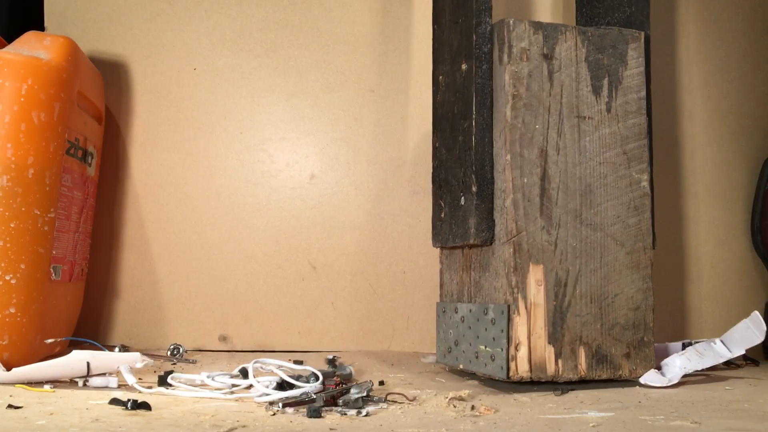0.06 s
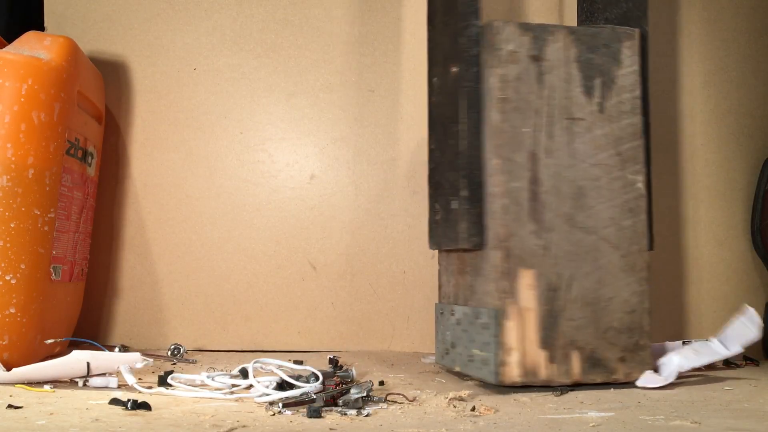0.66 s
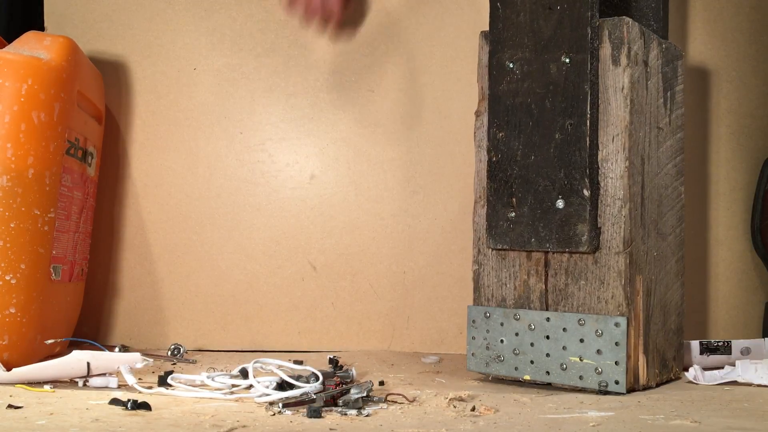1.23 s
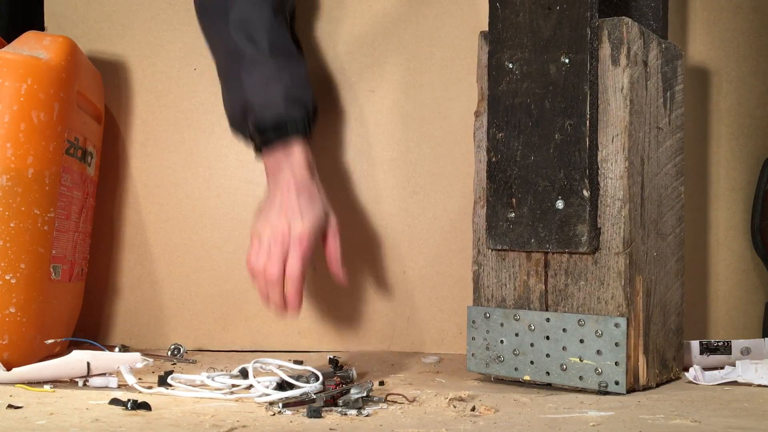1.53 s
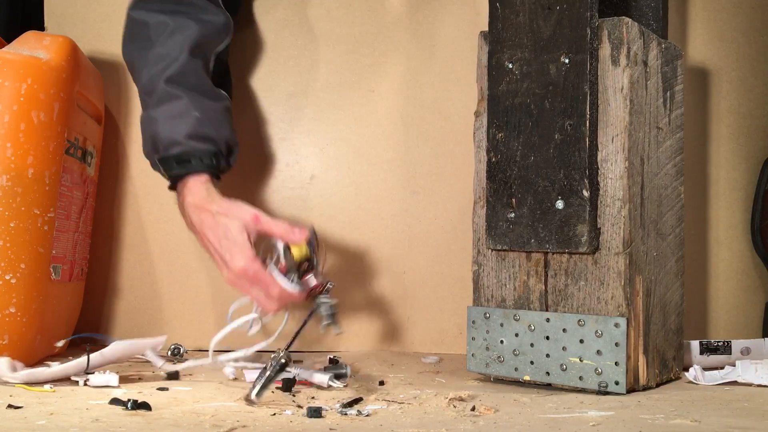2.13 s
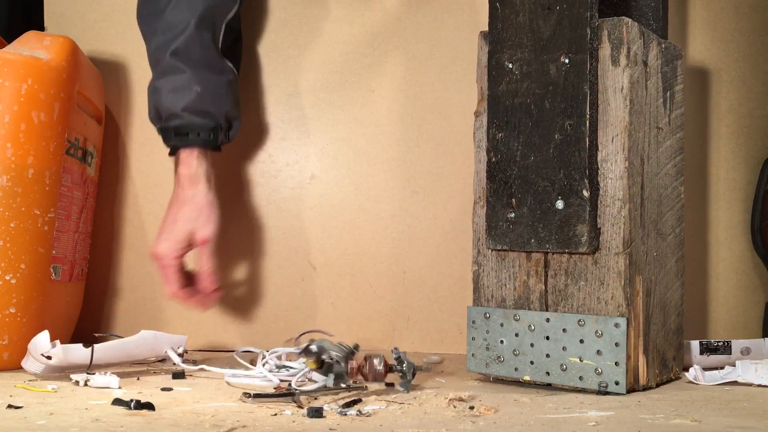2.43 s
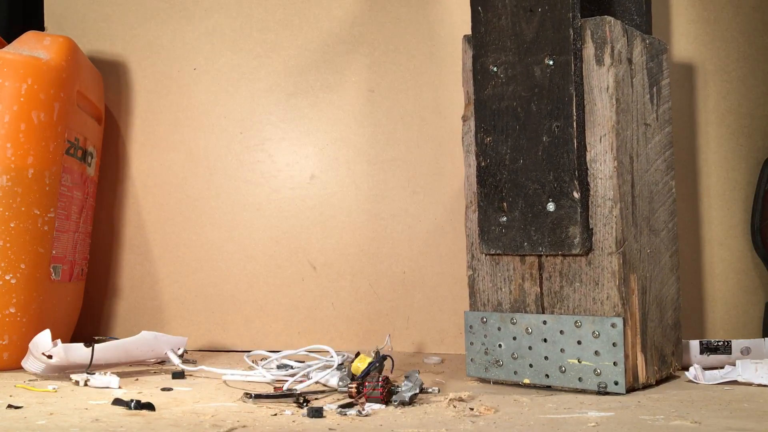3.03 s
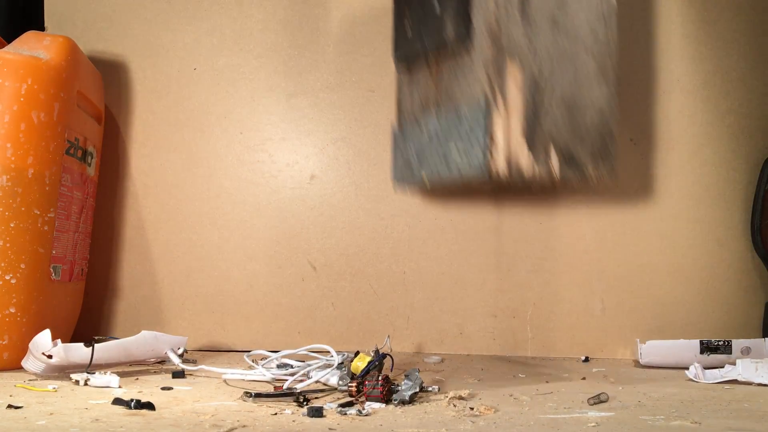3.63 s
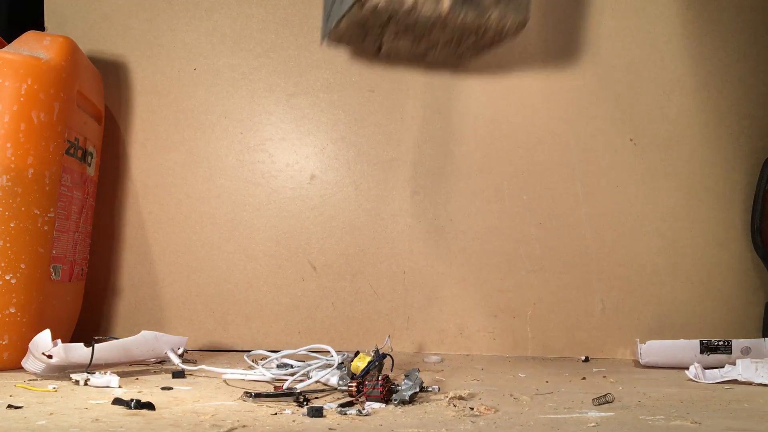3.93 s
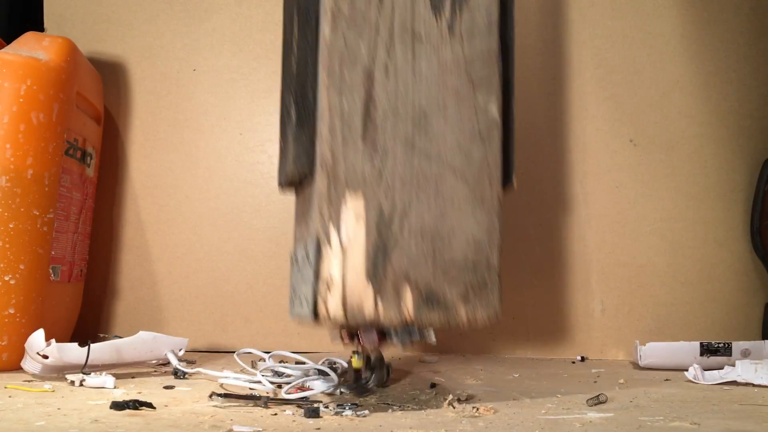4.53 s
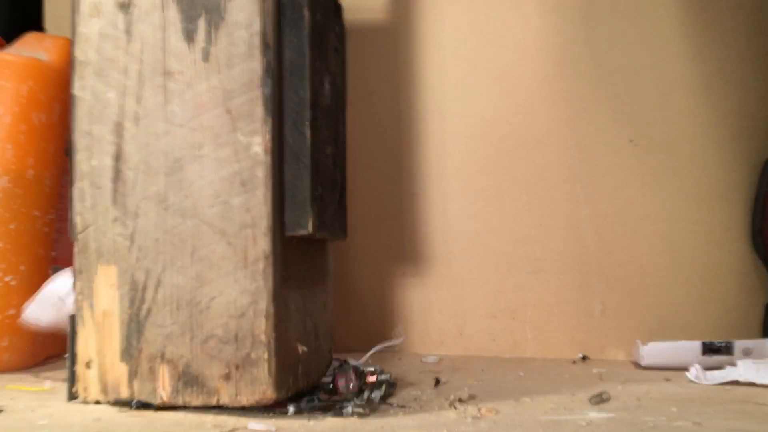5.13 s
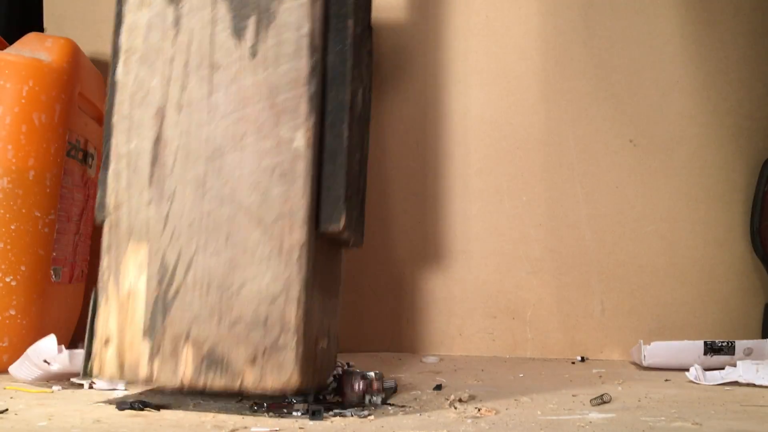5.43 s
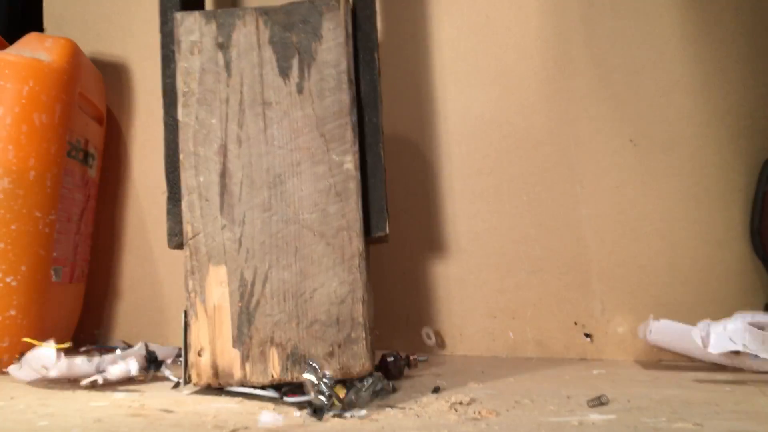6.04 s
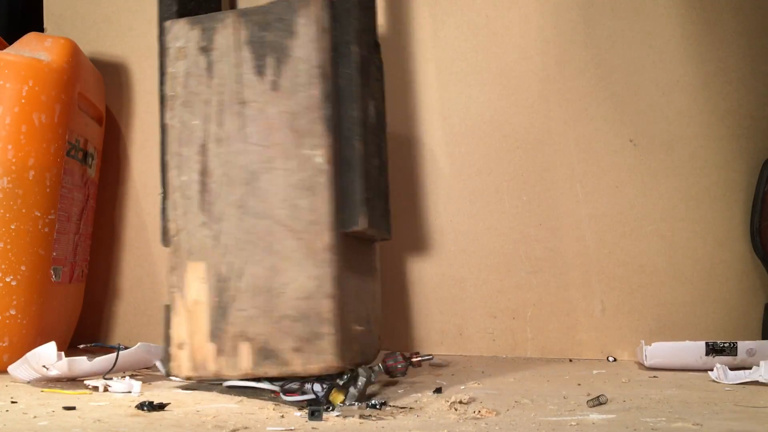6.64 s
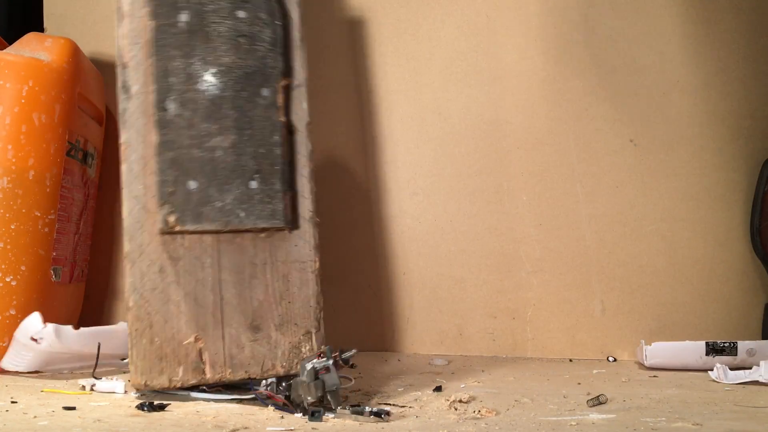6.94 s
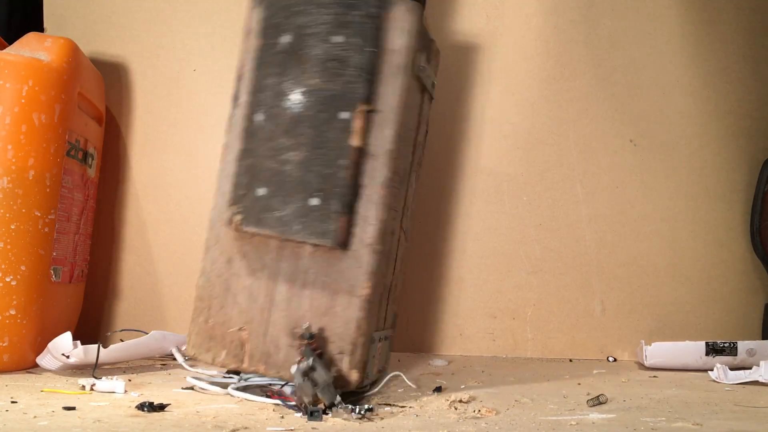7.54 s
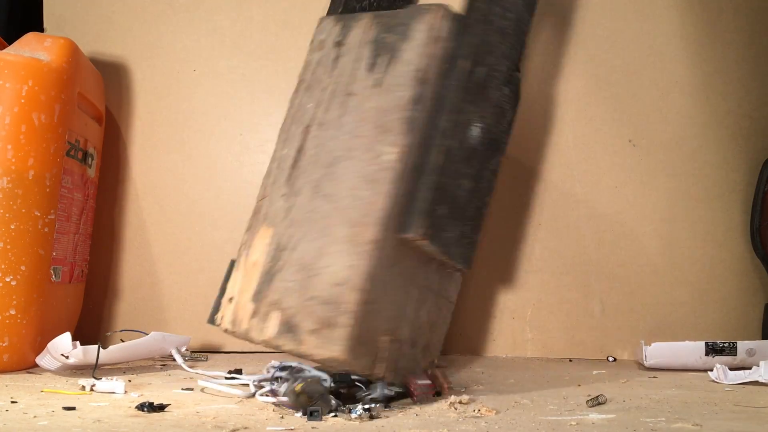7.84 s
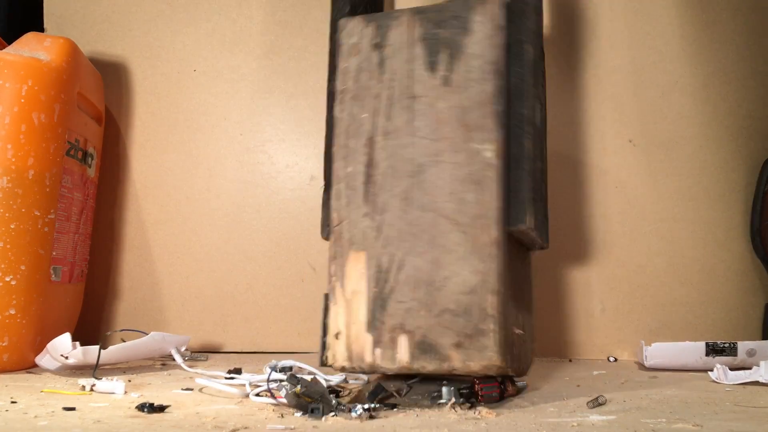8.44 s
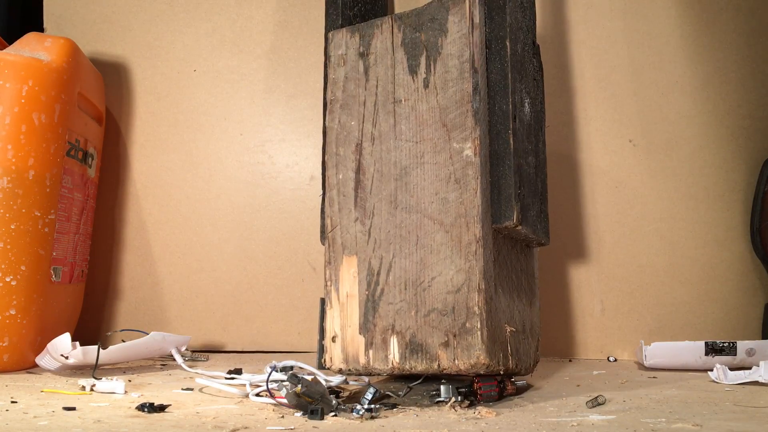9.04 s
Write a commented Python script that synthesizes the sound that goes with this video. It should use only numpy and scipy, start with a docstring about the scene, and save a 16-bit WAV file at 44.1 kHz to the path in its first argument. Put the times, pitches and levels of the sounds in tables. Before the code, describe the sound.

For the first 1.5 seconds a heavy wooden beam shuffles over a workbench with scrapes, knocks and soft bumps. Broken appliance pieces are then shifted, rattling, and drop with a sharp plastic clatter and metal clink at 2.5 seconds. A short scrape and knock follow near 3.5. At about 4.2, 5.2 and 6.1 seconds the beam slams down, the loudest sounds, each a burst of crunching plastic with a deep boom from the bench. Between the blows, bits clatter and a small motor clinks brightly, most clearly near 4.9. From 6.3 to 8.4 seconds the beam grinds over the wreckage with gritty scraping, snaps and brief wooden groans. It thumps down around 8.6 and gives a short, high metallic squeak just after 9. The microphone is close, in a small workshop with a very short echo and a faint low rumble.

```python
"""Wooden beam smashing an appliance

One microphone, close to a bench in a small workshop. A heavy beam is shuffled over the bench, then
slammed three times onto a broken appliance: plastic crushes and the bench top booms. Between blows
a hand shifts the wreckage, plastic bits clatter, the little motor clinks, and the beam grinds over
the pieces before it is set down with a squeak. Behind it all are a short room tail and low rumble."""
import sys
import numpy as np
from scipy import signal
from scipy.fft import rfft, irfft
from scipy.io import wavfile
from scipy.ndimage import uniform_filter1d

SR = 44100
rng = np.random.default_rng(int(sys.argv[2]) if len(sys.argv) > 2 else 0)


def generate_wav(sig):
    """Save sig (samples, or channels by samples) to the path in sys.argv[1] as 16-bit PCM at SR."""
    pcm = np.round(np.clip(np.atleast_2d(sig).T, -1, 1) * 32767).astype(np.int16)
    wavfile.write(sys.argv[1], SR, pcm)


N = 409248
TIME = np.arange(N) / SR


# Spectrum of plastic being crushed: frequency_hz, relative_db
CRUSH_SPECTRUM = [(60, -27), (170, 16), (400, 9), (800, -5.5), (1300, -9), (2100, -11.5), (3000, -21.5),
                  (5000, -30), (6500, -28), (10000, -35), (16000, -40)]
# The beam comes down, close to the microphone:
# start_s, crush_db, boom_relative_db, splinter_relative_db, rise_s, bench_thud_db
BEAM_BLOWS = [(4.2313, -13, -1, -8, 0.0056, -8.5), (5.214, -9.5, -21, -6, 0.0032, -6),
              (6.091, -10.5, -2, -12.5, 0.0039, -10.5)]

def crush(hold_s=0.0052, clump_db=4.0, clump_hz=400, t60s_s=(0.15, 0.18, 0.13), boom_lag_s=0.00725):
    """Plastic gives way under each blow in a clumped burst of fractures; the splinters stop first."""
    out, t = np.zeros(N), TIME[:SR // 2]
    responses = wood_responses(CRUSH_SPECTRUM)
    lags = (boom_lag_s, 0, 0)  # the heavy wood follows later
    for start, db, boom_db, splinter_db, rise, _ in BEAM_BLOWS:
        onset = np.minimum(t / rise, 1) ** 2
        fractures = onset * rng.standard_normal(len(t)) * amp(clump_db * wander(len(t), clump_hz))
        for response, relative_db, t60, lag in zip(responses, (boom_db, 0, splinter_db), t60s_s, lags):
            force = fractures * decay(t - rise - hold_s, t60)
            add(out, start + lag, strike(force, response, db + relative_db))
    return out


# Bending modes of the bench top: pitch_hz, relative_db, t60_s, build_up_s
BENCH_MODES = [(55.9, -7.5, 0.52, 0.042), (68.64, -28, 0.99, 0.1), (95.6, -6, 0.22, 0.015),
               (120.3, -1.5, 0.26, 0.019), (139.3, -13.5, 0.33, 0.037), (164.5, -9.5, 0.18, 0.017),
               (204, -15, 0.28, 0.032), (251, -16, 0.32, 0.029), (348, -19, 0.35, 0.0034),
               (488, -19.5, 0.18, 0.0066)]

def thud(contact_s, uneven_db=1.0, detune=0.014, tension=0.06, tension_s=0.041):
    """The bench top swings up and rings, sinking in pitch as the load eases."""
    t, out = TIME[:SR], 0
    gliding_time = t + tension * tension_s * (1 - np.exp(-t / tension_s))
    for hz, db, t60, build in BENCH_MODES:
        place, load = rng.standard_normal(2)
        swell = np.sin(np.pi / 2 * np.minimum(t / (0.71 * build), 1)) ** 4
        gain = amp(db + uneven_db * place) / (1 + (hz * contact_s) ** 4)  # soft contact: low modes only
        tone = np.sin(2 * np.pi * hz * (1 + detune * load) * gliding_time)
        out = out + gain * swell * decay(t - build, t60) * tone
    return out


# The beam settles or rebounds on the bench: start_s, level_db, contact_s
BEAM_BUMPS = [(.0, -26, 0.015), (.121, -27, 0.012), (0.441, -31, 0.015), (0.918, -27.5, 0.0018),
              (1.108, -31, 0.0015), (2.494, -25, 0.0018), (4.532, -18, 0.014), (4.67, -32.5, 0.01),
              (5.372, -31.5, 0.0054), (5.588, -27, 0.0082), (5.72, -33.5, 0.0074), (6.379, -28.5, 0.0079),
              (6.699, -33, 0.0071), (7.64, -31, 0.013), (8.556, -19, 0.00357), (8.591, -23.5, 0.0036)]

def bench():
    """The weight of the beam arrives on the bench, hard in the blows and softer in the bumps."""
    out = np.zeros(N)
    for start, *_, db in BEAM_BLOWS:
        add(out, start, amp(db) * thud(contact_s=0))
    for start, db, contact in BEAM_BUMPS:
        add(out, start, amp(db) * thud(contact))
    return out


# Spectrum of a piece hitting wood: frequency_hz, relative_db
KNOCK_SPECTRUM = [(60, -15), (180, 10.5), (450, 10.5), (900, 8.5), (1600, 4), (2400, -2.5), (3500, -7.5),
                  (5000, -12.5), (8000, -15.5), (12000, -21.5), (16000, -25.5)]
# Pieces knock and snap on the bench: start_s, body_db, clatter_relative_db, click_relative_db, pitch_hz
PIECE_KNOCKS = [(0.013, -40, 8.5, -15, 1300), (.0365, -33.5, -21, -6, 830), (.078, -50, 13.5, 10, 3000),
                (0.114, -50.5, -1, 7, 4300), (0.189, -55, -6, 3, 3300), (0.224, -38, -4, -33, 604),
                (0.4077, -45, 0, -18, 1840), (.426, -39, -14, -26, 1840), (.496, -53.5, -2, 5.5, 1110),
                (0.9167, -32, -5, -33, 1850), (0.95, -42, 4, -3, 970), (.98, -32, -11, 4, 970),
                (1.0398, -30, 6.5, -3.5, 774), (1.097, -34, 1, -4.5, 2160), (1.259, -27.5, -13, 5.5, 906),
                (1.338, -32, 4.5, -4, 880), (1.57, -46.5, -23, -10, 1120), (1.701, -49, 7, 5, 1470),
                (1.718, -45, 9, 9.5, 1350), (1.869, -37, -24, -8, 1370), (1.924, -41, 2, -19, 1130),
                (2.065, -47, 6, 4, 1380), (2.119, -40, -3, -4, 475), (2.219, -50.5, -16, 9.5, 550),
                (2.307, -44, 9, 5.5, 1370), (2.347, -46.5, 6, 2, 1620), (2.406, -39.5, 3, -12, 805),
                (2.4399, -41, 19, 4, 1260), (2.456, -23.5, -2.5, -19, 690), (2.4887, -13.5, -13, -12, 640),
                (2.498, -26, 5.5, -8.5, 680), (2.8147, -33.5, -4.5, -31, 716), (3.272, -53, -11, -8, 1200),
                (3.403, -62, -21, 13, 3500), (3.472, -40, -1, -3, 2820), (3.4978, -28, 3.5, 2, 1850),
                (3.854, -56.5, 3, 14, 3800), (4.328, -35, 6, -5, 1100), (4.469, -39.5, 11.5, -19, 1490),
                (4.53, -51.5, 12.5, -23, 1450), (4.549, -50, 2, 2.5, 1280), (4.764, -41, 0.5, -30, 920),
                (4.855, -33.5, -2.5, -10, 464), (4.873, -37.5, -16, -0.5, 366),
                (4.911, -50, 1.5, 13.5, 2840), (4.946, -27, -1, 4, 1824), (5.0645, -46.5, 3.5, -4, 1780),
                (5.4805, -39, 8, 3, 1280), (5.5076, -33.5, 7, -2, 930), (5.516, -27, -13, -3.5, 850),
                (5.736, -44, -1, -1, 468), (6.1592, -28, -3, -0.5, 1200), (6.346, -29.5, 3.5, -3.5, 910),
                (6.378, -37.5, 4, 2.5, 2600), (6.6106, -43, 2, -5, 2140), (6.8266, -42.5, -10, -4, 1900),
                (6.9023, -38.5, -3, 5, 1500), (6.9505, -28.5, 8, 6, 1850), (6.9592, -27.5, -3, -0.5, 1760),
                (7.075, -32.5, -6, -8.5, 374), (7.376, -38, 3.5, 1.5, 2540), (7.396, -35.5, -3, -6, 1290),
                (7.6198, -44, 6, 1, 517), (7.644, -42.5, 17, 4.5, 734), (7.811, -33, -2, -27, 1300),
                (7.839, -30, 2, -25, 2360), (7.918, -31.5, -3, -1.5, 1860), (8.021, -35.5, 1, -5, 660),
                (8.086, -44, 3.5, -17, 1250), (8.201, -39, -5, -28, 604), (8.3773, -42, -1, -9, 487),
                (8.54, -32, -12, -34, 460), (8.556, -27.5, -4, -39, 352), (8.629, -35, -14, -30, 863),
                (8.9258, -65, -10, 12.5, 3600), (9.045, -45, 4, -9, 1490), (9.057, -48, 7, -4, 940),
                (9.183, -43, -4, -6, 580)]

def knocks(attack_s=0.00067, snap_s=0.00085, t60_s=0.094, chatter_db=-1.5, click_fade_db_per_s=196):
    """Each piece lands with a snap, chatters against the wood and rings with its own short note."""
    out, t = np.zeros(N), TIME[:SR // 4]
    body, clatter, click = wood_responses(KNOCK_SPECTRUM)
    contact = (1 - np.exp(-t / attack_s)) * (0.58 * np.exp(-t / snap_s) + decay(t, t60_s))
    for start, db, clatter_db, click_db, hz in PIECE_KNOCKS:
        force = contact * rng.standard_normal(len(t)) * amp(chatter_db * wander(len(t), hz=900))
        add(out, start, strike(force, body, db))
        add(out, start, strike(force, clatter, db + clatter_db))
        add(out, start, strike(force * amp(-click_fade_db_per_s * t), click, db + click_db))
        note = resonate(np.diff(force * contact, prepend=0), hz, width_hz=70 + 0.0083 * hz)
        add(out, start, peak_level(note, db))
    return out


# The beam or the hand slides over the wreckage:
# hardest_push_s, rise_s, fall_s, force_db, body_relative_db, grit_relative_db
SLIDING_STROKES = [(0.019, 0.082, 0.19, -37.5, 1.5, -10.5), (.43, 0.14, 0.14, -46.5, 1.5, -12.5),
                   (.9, 0.22, 0.27, -50.5, 1, 0), (1.018, 0.12, 0.1, -30.5, 1.5, -11.5),
                   (1.3, 0.078, 0.14, -36.5, 4.5, -10.5), (1.6, 0.12, 0.23, -55.5, 4.5, 5),
                   (1.73, 0.075, .1, -39.5, -6, -5.5), (1.99, 0.22, 0.083, -40, 5.5, -8),
                   (2.28, 0.3, 0.1, -43, 7, -6), (2.5, 0.13, .12, -35.5, 9, -15),
                   (2.66, 0.13, .2, -47.5, 13, -15), (3.01, 0.45, 0.13, -53.5, 5.5, -14),
                   (3.29, 0.033, .4, -59, -5, -4), (3.49, 0.064, .05, -46, -13, -21),
                   (3.74, 0.023, .15, -62.5, -14, 8), (4.13, 0.41, .08, -57.5, 2, -10),
                   (4.23, 0.024, .03, -45, 8, -4.5), (4.36, 0.081, 0.15, -39, -2, -14),
                   (4.55, 0.06, .35, -48.5, 3.5, -8.5), (4.941, .11, .12, -37.5, 7.5, -9),
                   (5.511, 0.38, 0.12, -38.5, -2.5, -9), (5.761, 0.12, 0.04, -51.5, 10, -21.5),
                   (6.27, 0.2, 0.21, -35.5, -0.5, -10), (6.73, 0.08, 0.051, -40.5, 8.5, -16),
                   (6.921, 0.15, .2, -32, 1.5, -9.5), (7.19, 0.3, .2, -39, 1.5, -6),
                   (7.41, 0.032, 0.056, -43.5, 8.5, -1), (7.65, 0.059, 0.12, -35, 6.5, -20),
                   (7.99, 0.6, 0.29, -39, 3.5, -7.5), (8.37, 0.068, 0.11, -52, 11.5, -10),
                   (8.599, 0.059, 0.048, -32, 4, -8), (9.071, 0.033, 0.048, -39, -7, 0),
                   (9.2, 0.095, 0.1, -56, 3, 0)]

def stroke_gains(fade_db=15, roundness=1.72):
    """Each stroke swells to its hardest push and eases off: gains of hollow body, clatter and grit."""
    t, power = TIME[::64], 0
    for crest, rise, fall, db, body_db, grit_db in SLIDING_STROKES:
        from_crest = np.maximum((crest - t) / rise, (t - crest) / fall)
        band_db = db + np.array([[body_db], [0], [grit_db]])
        power = power + amp(band_db - fade_db * from_crest ** roundness) ** 2
    return [np.interp(TIME, t, gain) for gain in np.sqrt(power)]


# Spectrum of wreckage scraping on the bench: frequency_hz, relative_db
SCRAPE_SPECTRUM = [(50, -11), (110, 1.5), (200, 1.5), (480, -1.5), (900, -0.5), (1800, -5.5), (3000, -15.5),
                   (5000, -23), (8000, -26.5), (12000, -28.5), (16000, -33.5)]

def scrape(gains, spread_db=1.5, catch_db=4.0, catch_hz=70, snag_db=17, snag_s=0.0025, bits_db=-3.0):
    """Tiny uneven slips ring the wood, bunching and snagging as surfaces catch; hollow bits tumble."""
    sizes = amp(spread_db * np.minimum(rng.exponential(1, N), 4)) * rng.choice([-1, 1], N)

    def impulses(per_s):
        return sizes * (rng.random(N) < per_s / SR)

    slips = impulses(per_s=3000) * amp(catch_db * wander(N, catch_hz))
    snag = rng.standard_normal(SR // 20) * np.exp(-TIME[:SR // 20] / snag_s)
    snags = signal.oaconvolve(impulses(per_s=16), snag / np.linalg.norm(snag))[:N]
    friction = slips + amp(snag_db) * snags
    rub = sum(gain * unit(signal.oaconvolve(friction, response)[:N])
              for response, gain in zip(wood_responses(SCRAPE_SPECTRUM), gains))
    bits = sum(amp(read(SCRAPE_SPECTRUM, hz)) * resonate(impulses(per_s=5), hz, width_hz=70)
               for hz in np.geomspace(480, 2400, num=16))
    return rub + gains[1] * amp(bits_db) * unit(bits)


def tinkles(grit_gain, per_s=45, relative_db=-6, spread_db=4, lowest_hz=3500):
    """Screws and shards shaken by the sliding tick at random pitches across two high octaves."""
    out, click = np.zeros(N), signal.unit_impulse(4096)
    for when, pitch, size in rng.random((int(per_s * N / SR), 3)):
        at = int(when * N)
        tick = resonate(click, lowest_hz * 4 ** pitch, width_hz=220)
        add(out, at / SR, grit_gain[at] * peak_level(tick, relative_db + spread_db * (2 * size - 1)))
    return out


# Modes of the motor's steel: pitch_hz, relative_db, t60_s
STEEL_MODES = [(4447, 0, .42), (6670, -1, .3), (7120, -3, .28), (8200, -7, .18), (9300, -8, .25),
               (10970, -7, .3), (12000, -11, .16), (15100, -3, .25)]
# The little motor is struck or rubbed: start_s, level_db, favoured_hz, t60_factor, contact_s
MOTOR_CLINKS = [(2.12, -34, 8300, 0.2, .002), (2.294, -37, 4620, 0.85, 0.0034),
                (2.343, -43, 7200, .6, .003), (2.492, -36, 4450, 0.77, 0.0043),
                (2.495, -25, 10970, 0.36, .004), (2.907, -51, 6670, 0.16, .003),
                (4.945, -22.5, 6900, 0.23, 0.0016), (5.013, -36, 7160, 0.45, .003),
                (7.239, -44.5, 4447, 0.26, 0.012), (7.394, -34, 11100, 0.6, 0.0064),
                (9.063, -35.5, 9000, 0.97, 0.032)]

def clinks(focus_db_per_octave=24, rattle_db=-10, rattle_hz=300):
    """Steel swells while touched, then rings and rattles; the place of contact favours some partials."""
    out, t = np.zeros(N), TIME[:SR // 2]
    for start, db, favoured_hz, t60_factor, contact in MOTOR_CLINKS:
        for hz, mode_db, t60 in STEEL_MODES:
            gain = amp(db + mode_db - focus_db_per_octave * abs(np.log2(hz / favoured_hz)))
            envelope = np.minimum(t / contact, 1) * decay(t - contact, t60 * t60_factor)
            rattle = 1 + amp(rattle_db) * wander(len(t), rattle_hz)
            add(out, start, gain * envelope * rattle * np.sin(2 * np.pi * hz * t))
    return out


# Small hard bits land on the bench: start_s, level_db, pitch_hz
BIT_TINKS = [(1.391, -40.5, 1070), (1.421, -51, 1085), (1.716, -31.5, 1485), (5.418, -31, 3650),
             (5.417, -31, 7000), (5.593, -37, 9000), (5.736, -55.5, 6500), (8.02, -40, 10450)]

def tinks(q=52, contact_s=0.0041):
    """Each bit rings on one narrow note as it lands."""
    out = np.zeros(N)
    for start, db, hz in BIT_TINKS:
        add(out, start, ping(db, hz, hz / q, contact_s, hardness=1))
    return out


# Cracks in the casing: start_s, level_db
PLASTIC_CRACKS = [(2.067, -59.5), (2.245, -44), (2.486, -25), (3.497, -31), (3.856, -48), (4.238, -28.5),
                  (4.876, -38), (4.942, -20.5), (5.397, -37)]

def cracks():
    """Brittle plastic cracks with a thin, bright spit of treble."""
    out = np.zeros(N)
    for start, db in PLASTIC_CRACKS:
        add(out, start, ping(db, hz=12700, width_hz=4000, contact_s=0.014, hardness=2))
    return out


def squeak(start_s=9.05, length_s=0.115, level_db=-39, pitch_hz=4335, jitter=0.0062, rasp_db=3):
    """A metal edge rubbed by the settling beam sings on one rough, wavering note."""
    swell = np.sin(np.pi * np.clip((TIME - start_s) / length_s, 0, 1))
    rasp = unit(amp(rasp_db * wander(N, hz=350)))
    pitch = pitch_hz * (1 + jitter * wander(N, hz=500))
    return amp(level_db) * swell * rasp * np.sin(2 * np.pi * np.cumsum(pitch) / SR)


# The beam's end grain judders on the bench: start_s, level_db, pitch_hz, length_s
BEAM_JUDDERS = [(3.261, -41.5, 377.5, 0.063), (4.644, -31, 510, 0.017), (6.724, -20.5, 320, 0.0079),
                (6.831, -28, 421, 0.069), (6.859, -25.5, 536, 0.031), (7.069, -35, 385, 0.053),
                (7.70, -26, 528, 0.042), (8.003, -30, 322, 0.024)]

def judders(jitter=0.065, overtone_db=-20):
    """Wood sticks and slips on wood in a short, unsteady groan."""
    out = np.zeros(N)
    for start, db, hz, length in BEAM_JUDDERS:
        count = int(length * SR)
        pitch = hz * (1 + jitter * wander(8192, hz=203)[:count])
        phase = 2 * np.pi * np.cumsum(pitch) / SR
        groan = np.sin(phase) + amp(overtone_db) * np.sin(2 * phase)
        add(out, start, amp(db) * signal.windows.tukey(count, 0.7) * groan)
    return out


# Resonances shared by beam and bench: centre_hz, width_hz, peak_db
WOOD_RESONANCES = [(367, 87, -7), (524.4, 22, 5), (687, 20, -15), (880, 90, -8.5), (1231, 76, 0),
                   (1920, 36, 0.5), (2350, 92, -11)]

def wood_responses(spectrum, body_hz=700, click_hz=3000, size=4096):
    """Wood and debris answer an impulse in three bands: hollow body, clatter and sharp click."""
    hz = np.fft.rfftfreq(size, 1 / SR)
    peaks = sum(amp(db) / (1 + (2 * (hz - centre) / width) ** 2) for centre, width, db in WOOD_RESONANCES)
    gain = amp(read(spectrum, hz)) * (1 + peaks)
    low = 1 / (1 + (hz / body_hz) ** 6)
    high = 1 - 1 / (1 + (hz / click_hz) ** 8)
    responses = []
    for share in (low, (1 - low) * (1 - high), high):
        log_gain = np.log(gain * np.sqrt(share) + 1e-5)
        mirrored = np.concatenate([log_gain, log_gain[-2:0:-1]])
        minimum_phase = np.exp(np.conj(signal.hilbert(mirrored)))  # nothing rings before the hit
        responses.append(np.fft.ifft(minimum_phase).real[:size // 2])
    return responses


# Bench top and back wall throw the sound straight back to the microphone: delay_s, relative_db
CLOSE_ECHOES = [(.0013, -25), (.0029, -32), (.0047, -24), (.0082, -20.5)]

def close_reflections(x):
    """Nearby surfaces give a sound on the bench a boxy colour."""
    out = x.copy()
    for delay, db in CLOSE_ECHOES:
        add(out, delay, amp(db) * x)
    return out / np.sqrt(1 + sum(amp(db) ** 2 for _, db in CLOSE_ECHOES))


# Decay of the workshop, farther from the microphone: frequency_hz, t60_s
WORKSHOP_DECAY = [(60, 0.23), (250, 0.13), (1000, 0.26), (2000, 0.24), (5000, 0.21), (10000, 0.24),
                  (16000, 0.13)]

def room(x, onset_s=0.024):
    """Dense reflections of a small room build up and die quickly, each band at its own rate."""
    hz, t, noise = signal.stft(rng.standard_normal(SR), SR, nperseg=256)
    fading = noise * decay(t, read(WORKSHOP_DECAY, hz)[:, None])
    tail = signal.istft(fading, SR, nperseg=256)[1][:SR]
    tail *= 1 - np.exp(-(TIME[:SR] / onset_s) ** 2)
    return signal.oaconvolve(x, tail / np.linalg.norm(tail))[:N]


# Room tone all around the microphone: frequency_hz, relative_db
ROOM_TONE_SPECTRUM = [(20, -34), (45, 4), (60, 14.5), (80, 7.5), (120, -4), (250, -7), (600, -19),
                      (1300, -18.5), (1850, -12.5), (2600, -22), (5000, -26), (9600, -31.5), (16000, -30.5)]

def room_tone(level_db=-52):
    """Steady workshop rumble and hiss."""
    colour = amp(read(ROOM_TONE_SPECTRUM, np.fft.rfftfreq(N, 1 / SR)))
    return amp(level_db) * unit(irfft(rfft(rng.standard_normal(N)) * colour, N))


def ping(db, hz, width_hz, contact_s, hardness):
    """A brief chatter excites one resonance of a small bit; a harder contact is brighter."""
    t = TIME[:SR // 5]
    chatter = np.sin(np.pi * np.minimum(t / contact_s, 1)) * rng.standard_normal(len(t))
    return peak_level(resonate(np.diff(chatter, hardness), hz, width_hz), db)


def strike(force, response, db):
    """A force rings one band of the wood at the given level."""
    return peak_level(signal.fftconvolve(force, response), db)


def resonate(force, hz, width_hz):
    """One damped mode driven by a force."""
    pole = np.exp((-np.pi * width_hz + 2j * np.pi * hz) / SR)
    return signal.lfilter([1], [1, -pole], force).imag


def decay(t, t60):
    """Holds at 1 until t = 0, then falls 60 dB every t60 seconds."""
    return amp(-60 * np.maximum(t, 0) / t60)


def wander(count, hz):
    """A random curve of rms 1 that turns hz times a second."""
    at = np.arange(count) * hz / SR
    return unit(np.interp(at, np.arange(count), rng.standard_normal(count)))


def peak_level(x, db):
    """Scales a hit so that its loudest 12 ms have the given rms level."""
    return amp(db) * x / np.sqrt(uniform_filter1d(x ** 2, size=530).max() + 1e-20)


def amp(db):
    """Decibels to gain."""
    return 10 ** (np.asarray(db) / 20)


def unit(x):
    """Scales to rms 1."""
    return x / np.sqrt(np.mean(x ** 2) + 1e-20)


def read(points, hz):
    """Reads a table on a log-frequency axis."""
    table_hz, value = np.transpose(points)
    return np.interp(np.log(hz + 1), np.log(table_hz + 1), value)


def add(mix, start_s, sound):
    """Mixes a sound in at its start time."""
    part = mix[max(0, round(start_s * SR)):][:len(sound)]
    part += sound[:len(part)]


def scene():
    """The bench up close and the workshop behind it, in mono."""
    gains = stroke_gains()
    blows = crush()
    rubbing = amp(-1.5) * close_reflections(scrape(gains) + tinkles(grit_gain=gains[2]))
    pieces = close_reflections(knocks()) + clinks() + tinks() + cracks() + squeak() + judders()
    reverb = room(amp(-18) * blows + amp(-16.5) * pieces + amp(-12) * rubbing)
    return (blows + bench() + pieces + rubbing + reverb + room_tone())[None]


def record(dry, ceiling=0.7, cutoff_hz=16350):
    """Overload rounds off the loudest peaks from the microphone; then the top treble is cut."""
    rounded = dry / (1 + (dry / ceiling) ** 6) ** (1 / 6)
    lowpass = signal.firwin(255, cutoff_hz, window=("kaiser", 8), fs=SR)
    return signal.oaconvolve(rounded, lowpass[None], "same")


dry = scene()
out = record(dry)
generate_wav(out)
```